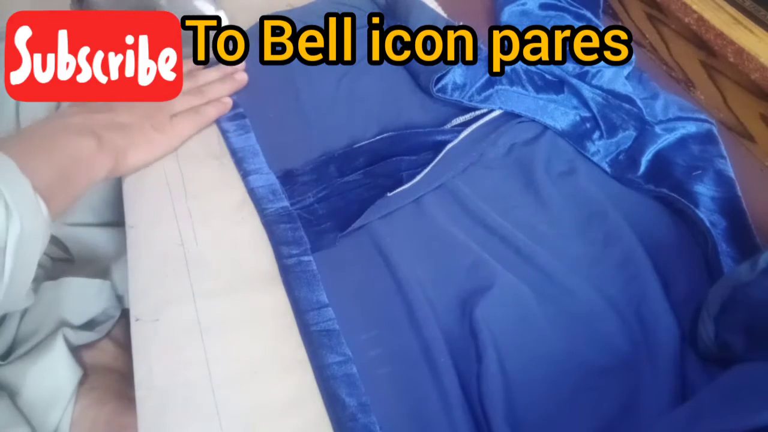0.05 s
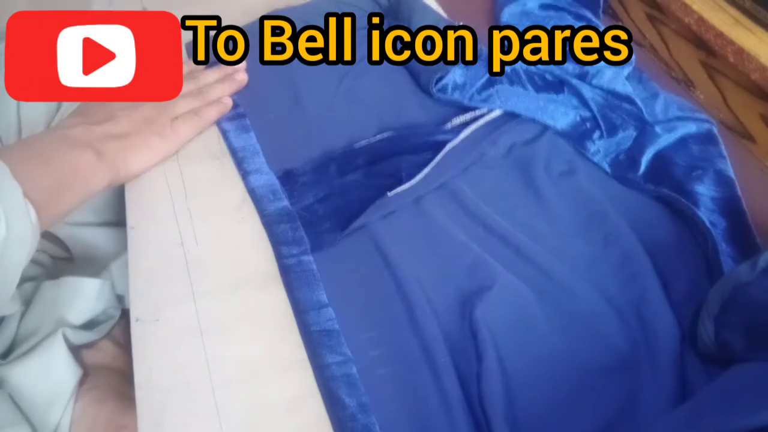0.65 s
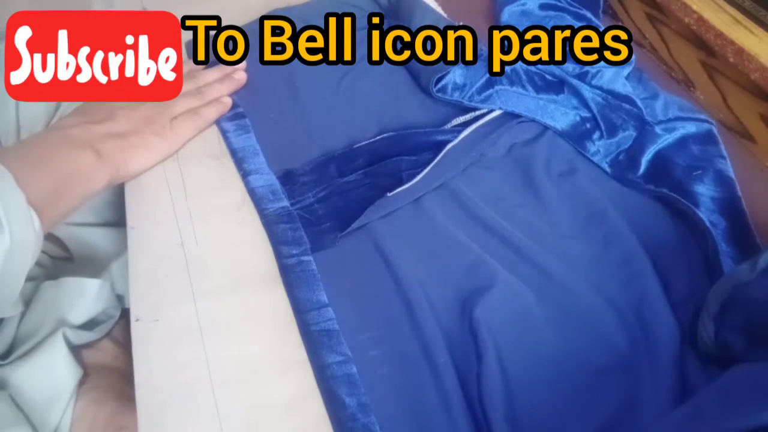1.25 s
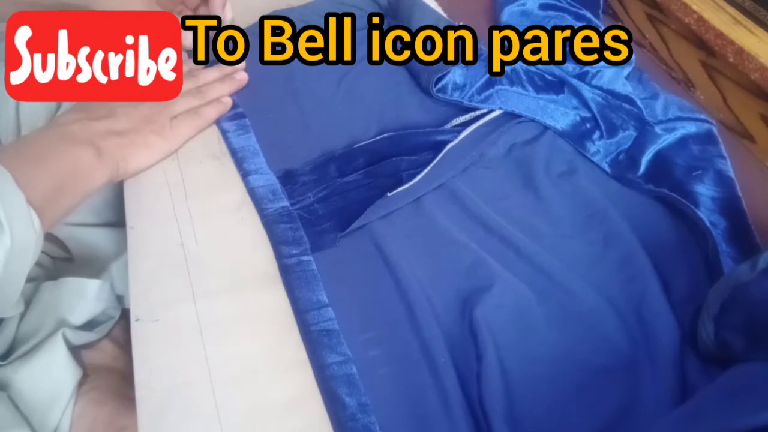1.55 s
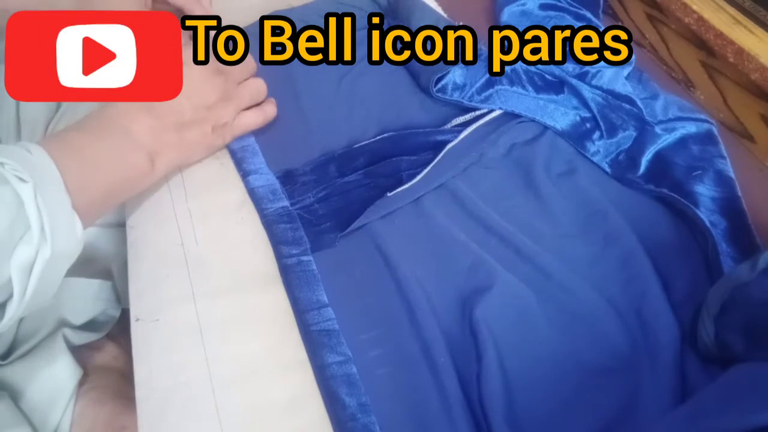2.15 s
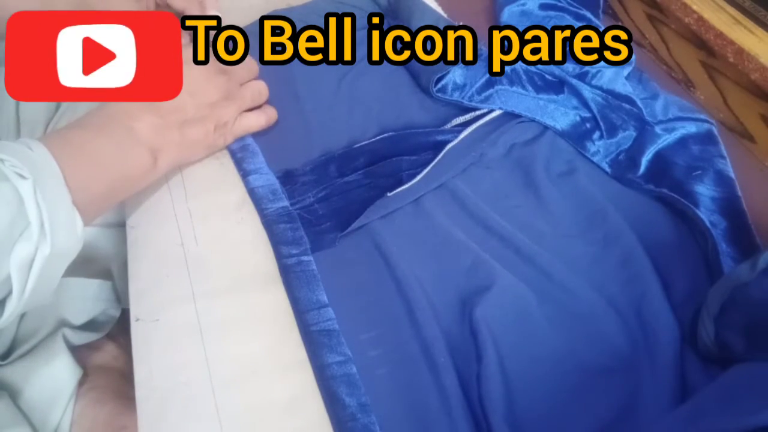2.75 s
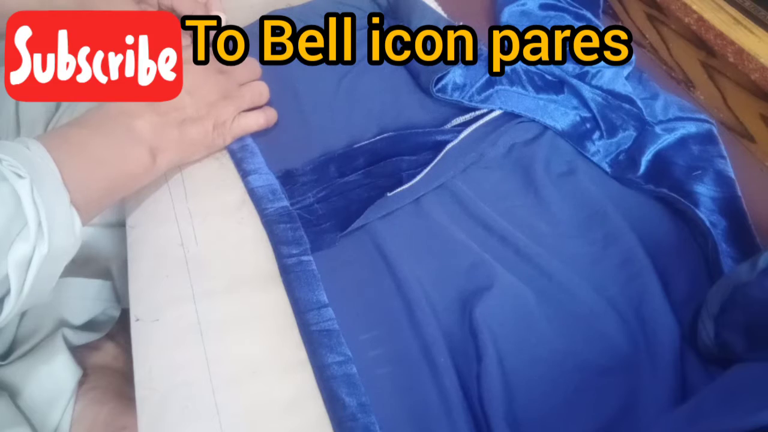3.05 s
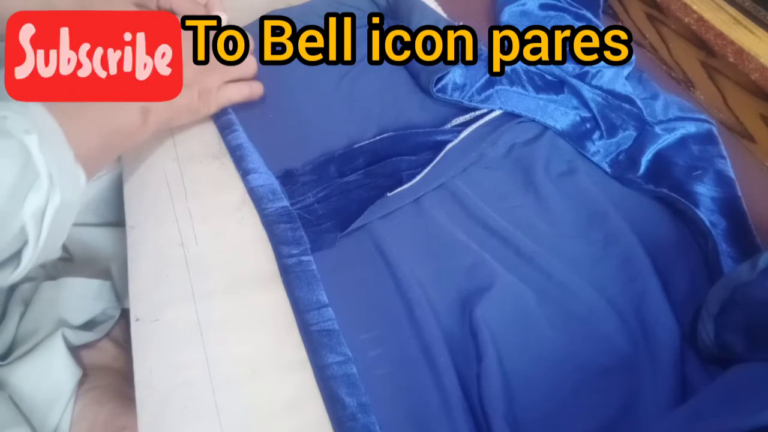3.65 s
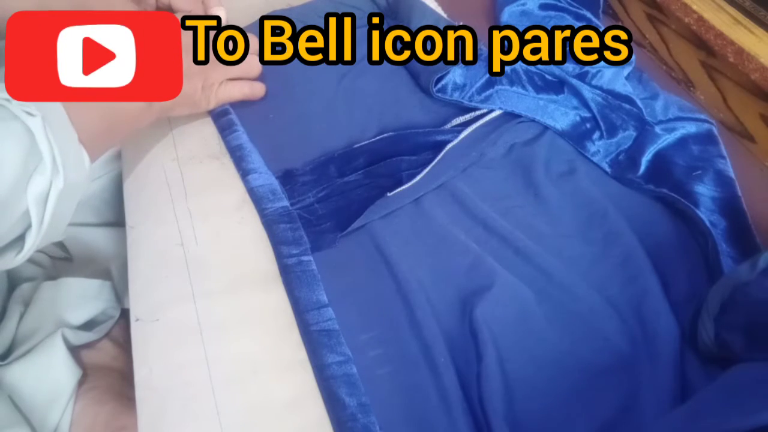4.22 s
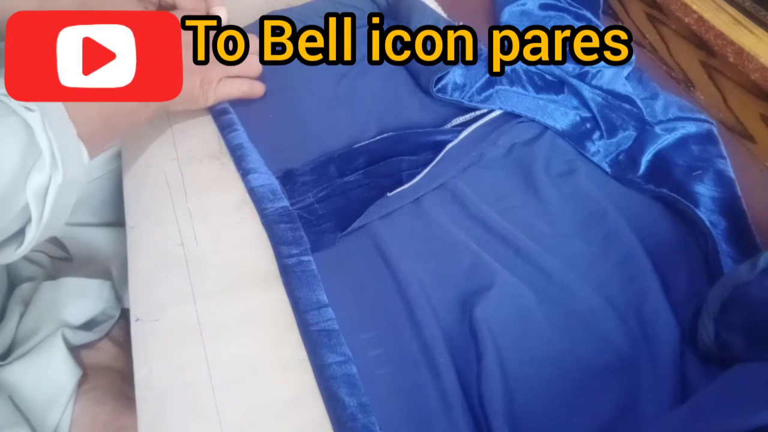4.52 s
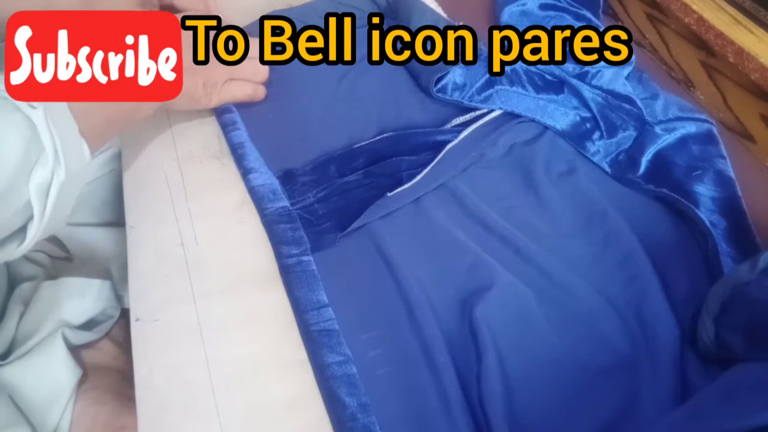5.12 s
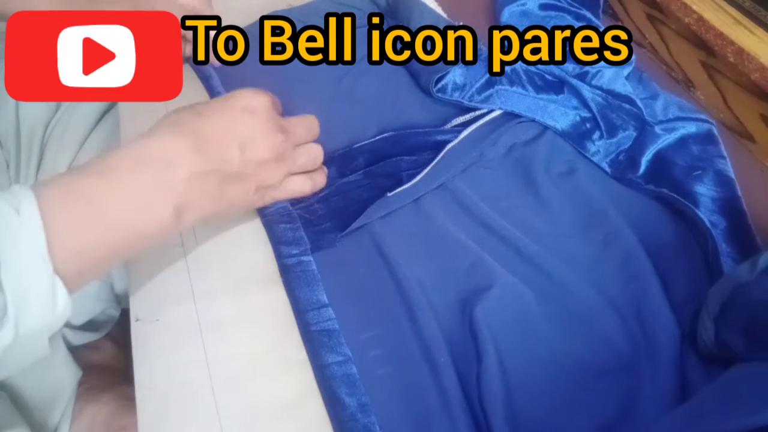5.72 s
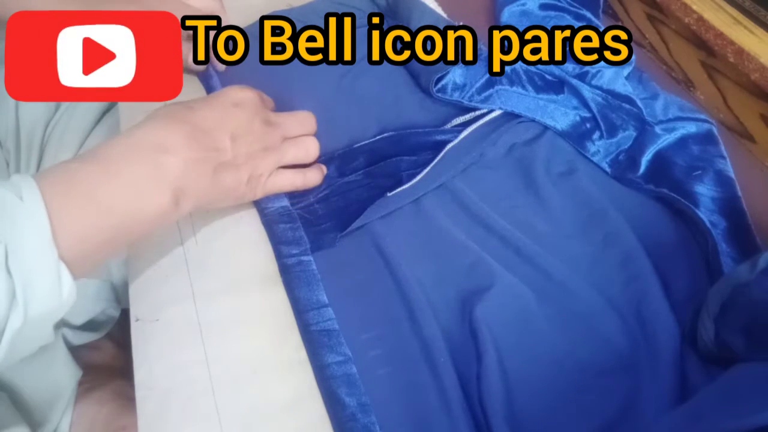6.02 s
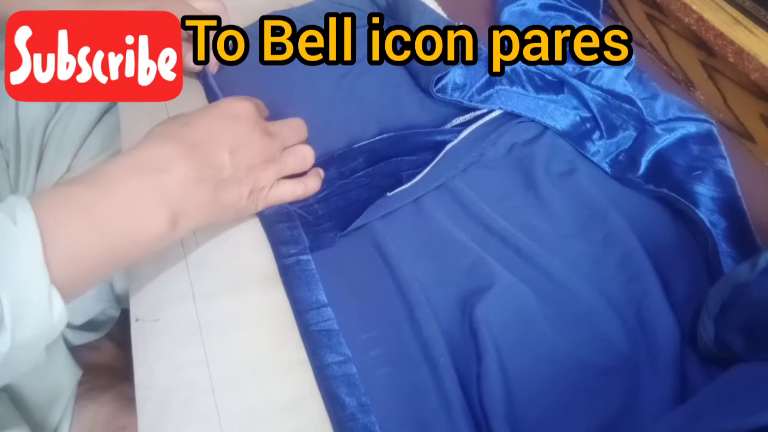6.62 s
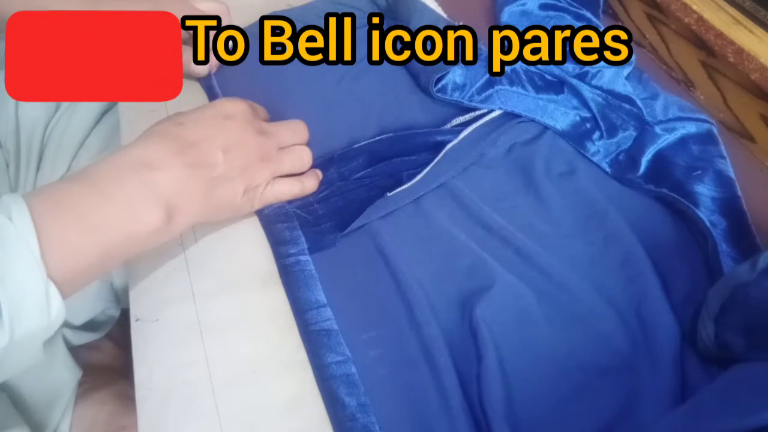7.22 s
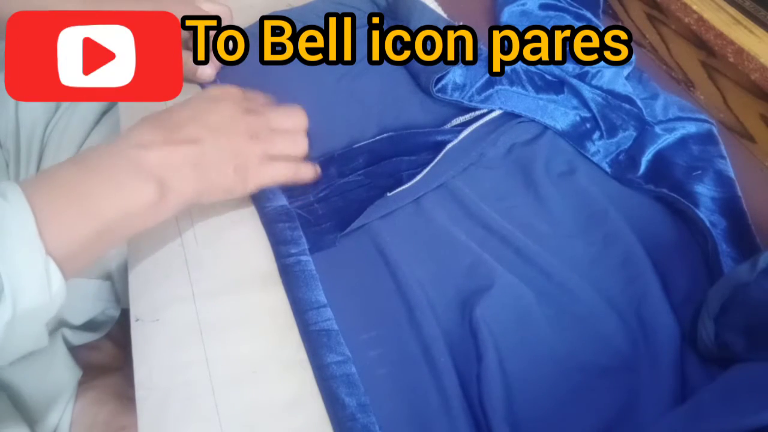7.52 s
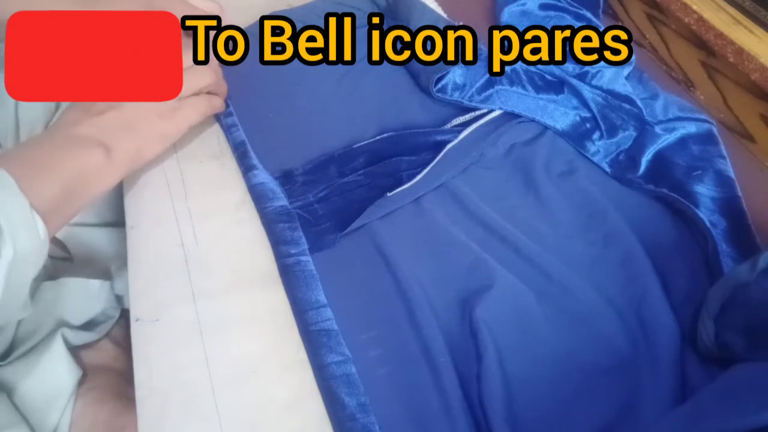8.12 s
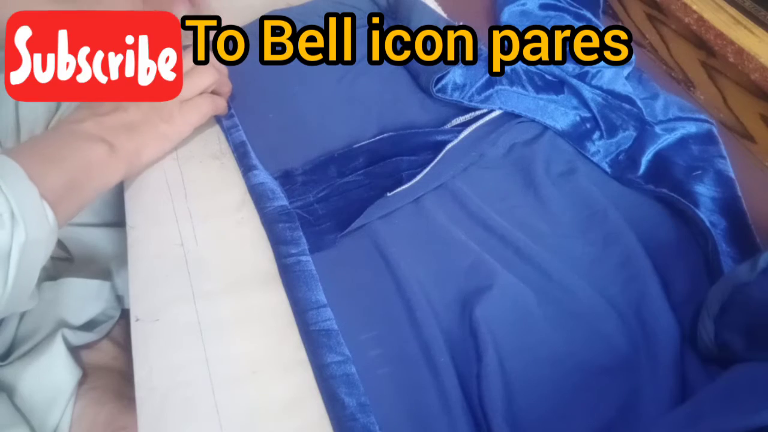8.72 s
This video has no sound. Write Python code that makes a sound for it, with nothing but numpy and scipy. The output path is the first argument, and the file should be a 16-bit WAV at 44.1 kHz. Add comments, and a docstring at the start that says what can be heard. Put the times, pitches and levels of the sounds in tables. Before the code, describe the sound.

A wooden board thumps softly under a leaning hand and gives a buzzing creak that slows into single clicks. Steel scissors are then dragged over rustling velvet, their blades clinking brightly, and are put down with a sharp clack and a short skid. After a lull come small dry ticks, a few dull thumps and very faint smoothing of the cloth. Everything is heard close in a small, hard room.

```python
"""A velvet hem is folded and pressed on a padded wooden board, heard close in a small, hard room.
The board thumps under the leaning hand and creaks by stick and slip, slowing into single clicks.
Steel scissors are dragged over the rustling cloth, their blades clinking, then put down with a clack
and a short skid. Small dry ticks follow, then a dull thump and soft smoothing of the velvet."""
import sys
import numpy as np
from scipy import signal
from scipy.fft import rfft, irfft
from scipy.io import wavfile
from scipy.ndimage import uniform_filter1d, map_coordinates

SR = 44100
rng = np.random.default_rng(int(sys.argv[2]) if len(sys.argv) > 2 else 0)


def master(y):
    """Save y as 16-bit WAV."""
    cut = np.clip(np.atleast_2d(y).T, -1, 1)
    pcm = np.round(cut * 32767)  # scale
    wavfile.write(sys.argv[1], SR, pcm.astype(np.int16))


N = 395136

# bright hiss of the velvet pile and of scraping blades: f/Hz, level/dB
HISS_SPECTRUM = [(2000, -23), (3500, -6), (5500, -5.5), (7600, 4), (9500, -6), (15000, -2)]


def amp(db):
    """Decibels to gain."""
    return 10 ** (np.asarray(db) / 20)


def unit(x):
    """Scale to rms 1."""
    return x / np.sqrt(np.mean(x ** 2) + 1e-20)


def along(points, hz):
    """Read a curve of (frequency, value) points on a log axis."""
    f, v = np.transpose(points)
    return np.interp(np.log(hz + 1), np.log(f + 1), v)


def wobble(rate):
    """A smooth random curve, rate knots a second."""
    return map_coordinates(rng.standard_normal(int(N * rate / SR) + 4), [np.arange(N) * rate / SR])


def noise(spectrum, size):
    """Coloured noise of rms 1."""
    colour = amp(along(spectrum, np.fft.rfftfreq(size, 1 / SR)))
    return unit(irfft(rfft(rng.standard_normal(size)) * colour, size))


def fade(attack, t60):
    """Percussive envelope, half a second long."""
    t = np.arange(SR // 2) / SR
    return (1 - np.exp(-t / attack)) * np.exp(-np.log(1000) * t / t60)


def add(track, s, sound):
    """Mix a sound into a track at time s."""
    part = track[max(round(s * SR), 0):][:len(sound)]
    part += sound[:len(part)]


def stroke(start, length, attack_s=0.031, sag_db_per_s=11.5, release_t60=0.21):
    """Envelope of a hand movement: it swells, eases off while it lasts and dies away."""
    out, t = np.zeros(N), np.arange(SR) / SR
    rise = np.minimum(t / attack_s, 1)
    release = np.exp(-np.log(1000) * np.maximum(t - length, 0) / release_t60)
    add(out, start, rise * amp(-sag_db_per_s * np.minimum(t, length)) * release)
    return out


def resonator(modes, stiffness):
    """Impulse response of energy 1: damped modes, their pitches scaled by the stiffness."""
    t = np.arange(2048) / SR
    ring = np.zeros(len(t))
    for k, (hz, width, db) in enumerate(modes):
        envelope = amp(db) * width * np.exp(-np.pi * width * t)
        ring += (-1) ** k * envelope * np.sin(2 * np.pi * hz * stiffness * t)
    return ring / np.linalg.norm(ring)


def in_room(x, wet_db):
    """A sound with a fresh tail from the walls, which answer within a few milliseconds."""
    # decay of the room: f/Hz, t60/s
    decay = [(100, 0.99), (500, 0.55), (2500, 0.43), (7000, 0.3), (15000, 0.36)]
    hz, t, bands = signal.stft(rng.standard_normal(SR // 2), SR, nperseg=256)
    bands *= np.exp(-np.log(1000) * t / along(decay, hz)[:, None])
    tail = signal.istft(bands, SR, nperseg=256)[1]
    tail *= 1 - np.exp(-np.arange(len(tail)) / SR / 0.0016)
    tail *= amp(wet_db) / np.linalg.norm(tail)
    tail[0] = 1  # direct sound
    return signal.fftconvolve(x, tail)


def room_tone(air_db=-62):
    """A bed of still air with a faint, wavering electric hum."""
    # the quiet room: f/Hz, level/dB
    air_spectrum = [(15, -56.5), (25, -25), (102, -1.5), (127, -8.5), (223, -12.5), (270, -11),
                    (363, -17.5), (714, -14.5), (1400, -20.5), (3620, -23), (4740, -31), (7310, -27.5),
                    (16000, -44)]
    hum = np.sin(2 * np.pi * np.cumsum(99 + wobble(3)) / SR) * amp(-75 + wobble(4))
    return amp(air_db + .4 * wobble(3)) * noise(air_spectrum, N) + hum


def cloth():
    """Cloth drags over the board: each fold catches briefly at its own pitch, and the pile hisses."""
    # strokes over the cloth: t/s, length/s, rub level/dB, hiss level/dB
    gestures = [(2.389, 0.094, -48.5, -58), (2.534, 0.22, -55.5, -87), (2.85, 0.056, -49, -87),
                (3.098, 0.2, -31.5, -33), (3.326, 0.13, -40, -48), (3.48, 0.66, -44, -52.5),
                (3.69, 0.16, -40.5, -43), (3.976, 0.27, -41.5, -49), (4.424, 0.073, -51, -73),
                (4.55, .11, -43, -45), (5.41, .12, -77.5, -64.5), (5.65, 0.25, -76, -63.5),
                (8.358, 0.047, -67, -76), (8.608, .26, -65, -59.5)]
    # dull rub of cloth on the board: f/Hz, level/dB
    rub_spectrum = [(40, -17.5), (110, -5.5), (280, 1.5), (520, 0), (700, -7), (900, -1), (1300, -14),
                    (2200, -7.5), (4000, -19), (6000, -55.5)]
    envelopes = np.array([stroke(s, length) for s, length, _, _ in gestures])
    rub, hiss = np.sqrt(amp(np.array(gestures)[:, 2:].T) ** 2 @ envelopes ** 2)
    bands = signal.stft(noise(rub_spectrum, N), nperseg=512)[2]
    folds = uniform_filter1d(rng.standard_normal(bands.shape), size=5, axis=0)
    folds = unit(uniform_filter1d(folds, size=4, axis=1))  # patches in pitch and time
    crumple = unit(signal.istft(bands * amp(4.5 * folds), nperseg=512)[1][:N])
    catches = unit(amp(2.2 * wobble(70)))
    rustle = catches * (amp(-6) * rub * crumple + amp(-3.5) * hiss * noise(HISS_SPECTRUM, N))
    return in_room(rustle, wet_db=-6.5)[:N]


def ticks():
    """Tiny catches: each a sharp snap that is gone within milliseconds."""
    # small dry ticks: t/s, level/dB
    cues = [(0.5638, -47), (1.1988, -29), (1.4294, -34.5), (1.641, -25), (2.1053, -47), (2.339, -41),
            (2.9, -47), (5.044, -50), (6.4897, -25.5), (6.516, -28), (6.5375, -29), (6.5732, -29),
            (6.656, -30), (6.784, -30.5), (6.989, -33), (7.1444, -25.5), (7.498, -37)]
    # colour of a snap: f/Hz, level/dB
    snap_spectrum = [(240, -9.5), (400, -5.5), (1510, -5.5), (3310, -3), (4950, -10), (7400, 1),
                     (10100, -10.5), (14600, -4), (16000, -21.5)]
    out = np.zeros(N)
    for s, db in cues:
        snap = amp(db - 5) * noise(snap_spectrum, SR // 2) * fade(0.000095, 0.038)
        add(out, s, in_room(snap, wet_db=-6.5))
    return out


def thumps():
    """A soft blow gives the board a push of a cycle or two, then its panel and frame rumble on."""
    # dull blows on the board: t/s, force/dB, push f/Hz
    blows = [(0.622, -41.5, 316), (0.633, -31, 228), (6.101, -54.5, 268), (7.126, -24.5, 706),
             (7.145, -30, 474), (7.193, -35, 192.5), (7.243, -38, 76), (7.325, -41, 607),
             (7.358, -50.5, 112), (7.656, -44.5, 192), (7.688, -58.5, 170), (7.782, -54.5, 600)]
    # the board's low boom: f/Hz, level/dB
    boom_spectrum = [(25, -28.5), (60, -5.5), (150, 12.5), (260, 10.5), (400, -13), (700, -28),
                     (2000, -62.5)]
    # its midrange thud: f/Hz, level/dB
    thud_spectrum = [(200, -15.5), (450, 2), (800, -2.5), (1300, -7), (2500, -15), (4000, -27),
                     (12000, -39)]
    out, t = np.zeros(N), np.arange(SR // 2) / SR
    for s, db, push_hz in blows:
        push_db = db + 7 + 0.25 * (db + 35)  # the push stands out more in a heavy blow
        thud_db = db - 1.5 + 3 * np.log2(push_hz / 450)  # a quicker push gives more thud
        cycles = push_hz * t
        swell = cycles / .7 * np.exp(1 - cycles / .7)
        push = -amp(push_db) * np.sin(2 * np.pi * cycles) * swell
        boom = amp(db - 6) * noise(boom_spectrum, SR // 2) * fade(0.00057, 0.29)
        thud = amp(thud_db) * noise(thud_spectrum, SR // 2) * fade(0.00055, 0.32)
        add(out, s, in_room(push + boom + thud, wet_db=-5.5))
    return out


def knocks(soft_rolloff=1.9):
    """Hard contacts excite dense, quickly damped wood modes; harder ones are brighter."""
    # hard things knocking on wood: t/s, level/dB, hardness/(dB per octave)
    hits = [(0.156, -52, -6.5), (0.37, -52, -2.5), (0.407, -45.5, -4), (0.646, -38.5, -1), (0.815, -36, -2),
            (1.382, -37, 0), (1.388, -32, -0.5), (1.46, -41.5, 0), (1.639, -31.5, -0.5),
            (1.939, -53.5, -0.5), (2.62, -48, -2), (2.853, -48.5, -3.5), (2.935, -44, -3.5),
            (3.114, -35.5, 2), (3.199, -20.5, 1), (3.592, -49.5, -2.5), (3.667, -39, 3), (3.697, -39.5, -3),
            (3.782, -47.5, -5.5), (3.819, -49.5, -2), (3.922, -44, -2.5), (3.963, -49.5, 9.5),
            (4.194, -41.5, 1.5), (4.225, -38.5, 2), (4.3, -49.5, -6.5), (4.421, -41, -0.5),
            (4.442, -34.5, -0.5), (4.543, -18, 2.94), (6.388, -45.5, 0), (6.431, -38, -2),
            (7.102, -41, -2.5), (7.497, -34.5, -3.5), (7.655, -44, 0)]
    # the wood's clack: f/Hz, level/dB
    clack_spectrum = [(60, -12), (150, -11.5), (520, -5.5), (1000, -2.5), (1700, -4.5), (2400, 0),
                      (3500, -8.5), (5200, -11), (6400, -17), (7600, -9.5), (9800, -28.5), (15000, -21)]
    out, hz = np.zeros(N), np.fft.rfftfreq(SR // 2, 1 / SR)
    octaves = np.log2(np.maximum(hz, 350) / 2000)
    top_octaves = np.log2(np.maximum(hz, 7000) / 7000)  # soft contacts lose extra top end
    for s, db, hardness in hits:
        tilt_db = hardness * octaves + soft_rolloff * min(hardness, 0) * top_octaves
        wood = irfft(rfft(noise(clack_spectrum, SR // 2)) * amp(db + tilt_db))
        add(out, s, in_room(amp(12.5) * wood * fade(0.0054, 0.049), wet_db=-5.5))
    return out


def across_board(x):
    """Echoes from the edges of the board spread each slip over a few milliseconds."""
    echoes = fade(.0005, .03) * rng.standard_normal(SR // 2)
    echoes *= .57 / np.linalg.norm(echoes)
    echoes[0] = .82  # direct sound
    return signal.fftconvolve(x, echoes)[:N]


def creak():
    """Stick and slip under a leaning hand: a buzz that darkens and slows into single, uneven clicks."""
    # pace of the creak: t/s, slip rate/Hz
    slip_rate = [(.78, 375), (.92, 312), (1.0, 268), (1.1, 213), (1.18, 201), (1.29, 126), (1.36, 108),
                 (1.48, 88), (1.55, 55), (1.75, 68), (1.85, 54)]
    # the joint sticks and lets go once: t/s, level/dB
    lone_slips = [(1.603, -52), (1.676, -47), (1.888, -52)]
    # the board's resonances before stiffness scales them: f/Hz, width/Hz, level/dB
    board_modes = [(610, 200, -5.5), (1100, 460, -10.5), (2580, 124, -1), (2980, 167, -1),
                   (3444, 240, -0.5), (4240, 230, -2), (5230, 1100, -8.5), (6240, 160, -8.5),
                   (7020, 830, -7), (13300, 600, -13.5)]
    start_s, peak_s, end_s = 0.612, 0.93, 1.86  # the hand leans in, presses hardest, comes to rest
    rise_db_per_s, fall_db_per_s = 45, 14.5
    jitter, scatter_db = .0045, 1.2  # uneven pace and size at full speed; both grow as it slows
    t = np.arange(N) / SR
    rate = np.interp(t, *np.transpose(slip_rate))
    slowness = rate.max() / rate
    count = np.cumsum(rate * np.exp(jitter * slowness ** 2 * wobble(120))) / SR
    exact = np.interp(np.arange(1, count[-1] - 1), count, np.arange(N))  # slip times in samples
    at = exact.astype(int)
    size = np.sqrt(SR / rate[at])  # a longer stick lets go harder
    size *= amp(scatter_db * np.sqrt(slowness[at]) * rng.standard_normal(len(at)))
    slips = np.bincount(at, size * (1 - exact + at), N) + np.bincount(at + 1, size * (exact - at), N)
    # rough rubbing gives way to regular slips as the pressure builds
    regular = np.interp(t, (.72, .92), [.15, 1])
    slips = np.sqrt(regular) * slips + np.sqrt(1 - regular) * rng.standard_normal(N)
    slips += amp(-9) * rng.standard_normal(N) / slowness  # friction hisses while the slide is fast
    effort_db = -39.5 - np.maximum(rise_db_per_s * (peak_s - t), fall_db_per_s * (t - peak_s))
    slips *= amp(effort_db) * (t > start_s) * (t < end_s)
    for s, db in lone_slips:
        add(slips, s, amp([db]) * np.sqrt(SR / rate.min()))
    # a fast slide is pressed harder, which stiffens the contact; a slow, light one loses its treble
    fast = signal.fftconvolve(slips, resonator(board_modes, stiffness=1.012))[:N]
    slow = signal.fftconvolve(slips, resonator(board_modes, stiffness=.96))[:N]
    slow = signal.sosfilt(signal.butter(2, 8800, fs=SR, output='sos'), slow)
    blend = np.interp(rate, [120, 280], [0, 1])
    return in_room(across_board(slow + blend * (fast - slow)), wet_db=-4)[:N]


def skid():
    """Once put down, the scissors slide a little over the wood, and friction keeps them ringing."""
    # resonances of the skid before stiffness scales them: f/Hz, width/Hz, level/dB
    skid_modes = [(250.5, 70, -2), (540, 120, 0.5), (1667, 88, -2.5), (2400, 170, 4.5), (2820, 54, -2.5),
                  (5310, 78, -4.5), (7540, 73, -13)]
    friction = amp(-40) * stroke(start=4.55, length=0.13) * rng.standard_normal(N)
    return signal.fftconvolve(friction, resonator(skid_modes, stiffness=0.96))[:N]


def scissors():
    """Each touch rings four groups of blade modes; a hard one clamps the blades and damps them sooner."""
    # blade touches: t/s, then level/dB of the groups below 8 kHz and near 10.5, 13.5 and 14.5 kHz
    clinks = [(0.003, -53.5, -63, -55, -49), (0.688, -47, -60, -54, -42.5), (0.836, -63, -60, -44, -39.5),
              (2.433, -62, -65, -55, -53), (2.529, -55, -61, -53.5, -56), (3.133, -30, -31, -37, -35),
              (3.2, -33.5, -38.5, -26.5, -35), (3.268, -25, -24.5, -12, -21),
              (3.281, -19.5, -16, -13, -21.5), (3.472, -36.5, -41.5, -43, -47),
              (3.512, -39.5, -49, -29, -39), (3.542, -26, -28.5, -26, -33.5),
              (3.561, -28, -48.5, -42, -44.5), (3.615, -35, -45, -50, -38), (3.652, -33.5, -46, -32, -43.5),
              (3.706, -39.5, -37.5, -38.5, -36), (3.761, -35, -37.5, -33, -39),
              (3.816, -32, -41, -32.5, -46), (3.867, -30.5, -37.5, -46.5, -49),
              (3.886, -22.5, -35, -26, -36.5), (3.905, -37.5, -36, -40.5, -23.5),
              (4.008, -35.5, -42.5, -45.5, -34), (4.06, -24.5, -23, -27.5, -34.5),
              (4.088, -27, -44, -41, -28.5), (4.134, -25.5, -33, -33, -22), (4.487, -52.5, -60, -50, -45),
              (4.606, -46, -39, -36.5, -39.5), (4.657, -43, -56, -41.5, -39.5)]
    # modes of the steel blades: f/Hz, level/dB within the group
    blade_modes = [(5674, -50), (5782, -58), (7251, -40), (7440, -38), (7553, -40.5), (10427, -54.5),
                   (10680, -46), (13491, -46), (13604, -51.5), (14416, -43.5), (14788, -52.5)]
    # each group's answer to a -26 dB touch: attack/s, t60/s before the cap, flutter/dB
    mode_groups = [(0.0017, 0.25, 5), (0.0016, 0.15, 4), (.0015, 0.15, 4.5), (0.0055, 0.27, 3)]
    # borders between the groups: f/Hz
    group_edges = [9000, 12000, 14000]
    # one blade swings free of the grip: t/s, f/Hz, level/dB
    loose_blade = [(3.868, 1810, -47.5), (4.069, 4355, -44.5), (4.068, 4520, -42.5)]
    lift_s, drop_s, held_t60, lying_t60 = 3.1, 4.4, 0.47, 0.12  # the ring is capped shorter on the cloth
    halving_db, chatter_hz = 13, 65  # extra force that halves the ring time; pace of the flutter
    out, t = np.zeros(N), np.arange(SR // 3) / SR
    hz, mode_db = np.transpose(blade_modes)
    group = np.digitize(hz, group_edges)
    attack, ring_s, flutter_db = np.array(mode_groups)[group].T
    for s, *group_db in clinks:
        db = max(group_db)
        longest = held_t60 if lift_s < s < drop_s else lying_t60
        t60 = np.minimum(ring_s * 2 ** (-(db + 26) / halving_db), longest)
        gain = amp(mode_db + 2.5 * rng.standard_normal(len(hz)))
        gain = gain / np.sqrt(np.bincount(group, gain ** 2))[group] * amp(group_db)[group]
        grip_hz = hz + 7 * rng.standard_normal(len(hz))  # the grip detunes each mode a little
        # sliding contact jostles the phases at first, then they settle
        jolts = rng.standard_normal((len(hz), len(t))) * (.02 + .12 * np.exp(-t / .02))
        jostle = uniform_filter1d(np.cumsum(jolts, axis=1), size=60, axis=1)
        # the blades rub on each other, so each mode flutters
        flutter = amp(flutter_db[:, None] * rng.standard_normal((len(hz), 64)))
        envelopes = [np.interp(t * chatter_hz, np.arange(64), knots) * fade(rise, decay)[:len(t)]
                     for knots, rise, decay in zip(flutter, attack, t60)]
        phase = 2 * np.pi * (grip_hz[:, None] * t + rng.random((len(hz), 1))) + jostle
        ring = amp(1.5) * gain @ (envelopes * np.sin(phase))
        scrape = amp(db - 8) * noise(HISS_SPECTRUM, SR // 2) * fade(.0006, 0.031)
        add(out, s, in_room(ring + scrape[:len(t)], wet_db=-15.5))
    for s, blade_hz, db in loose_blade:
        add(out, s, amp(db) * np.sin(2 * np.pi * blade_hz * t) * fade(0.0064, 0.55)[:len(t)])
    return out


def scene():
    """Everything sits in the centre, with a trace of width in the treble."""
    mid = thumps() + knocks() + ticks() + scissors() + skid() + creak() + cloth() + room_tone()
    width = [(2500, -65.5), (5000, -32.5), (7400, -23.5), (13000, -16.5)]  # f/Hz, side level/dB
    side = irfft(1j * rfft(mid) * amp(along(width, np.fft.rfftfreq(N, 1 / SR))), N)
    return np.array([mid + side, mid - side])


def record(dry):
    """A brick-wall low-pass takes off the very top."""
    top_hz = 15900
    return irfft(rfft(dry) * (np.fft.rfftfreq(N, 1 / SR) < top_hz), N)


dry = scene()
out = record(dry)
master(out)
```